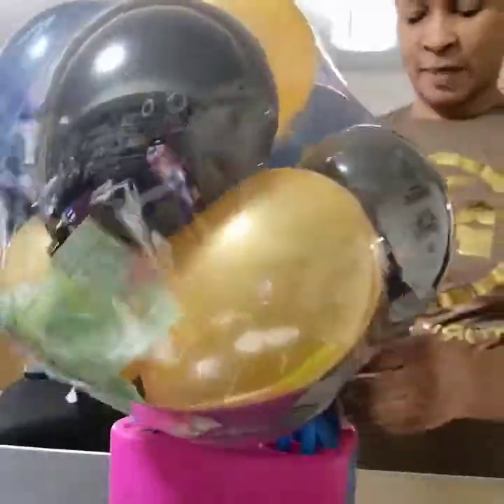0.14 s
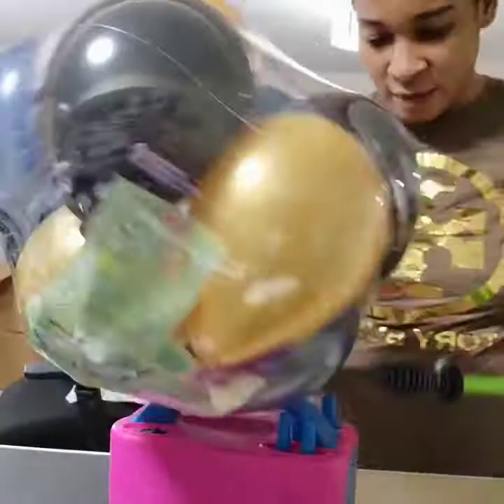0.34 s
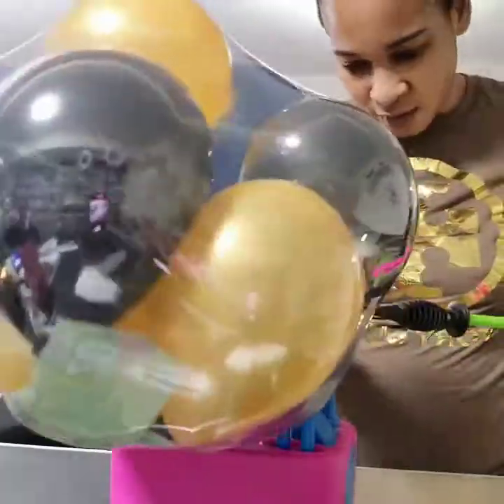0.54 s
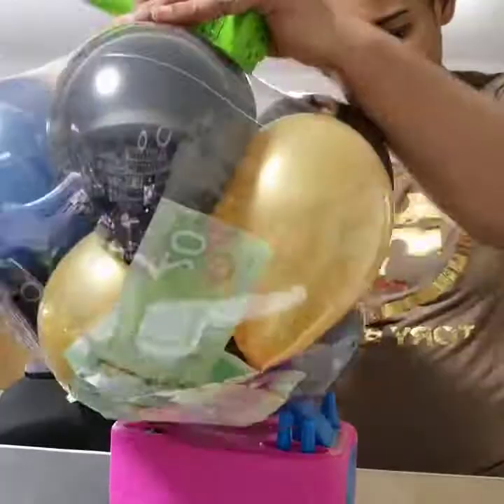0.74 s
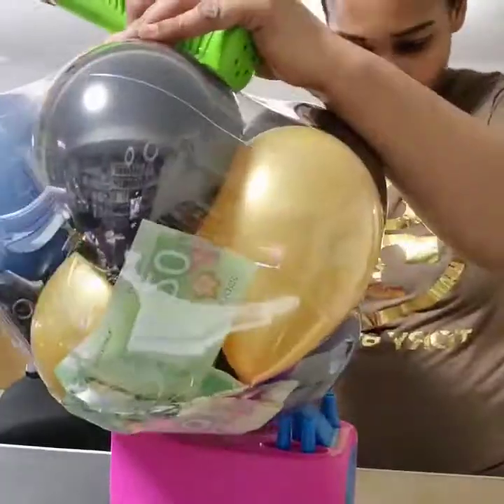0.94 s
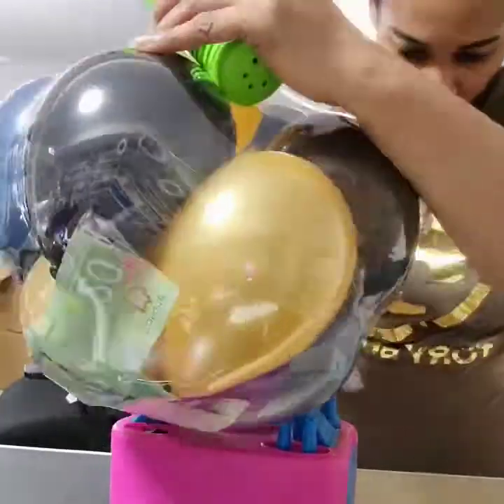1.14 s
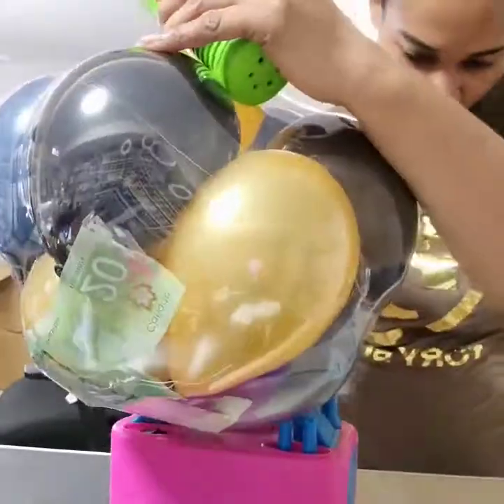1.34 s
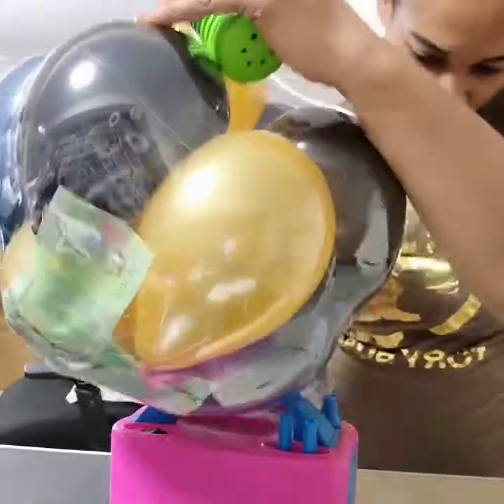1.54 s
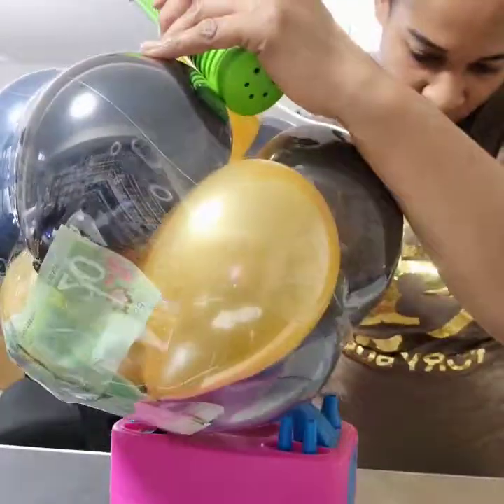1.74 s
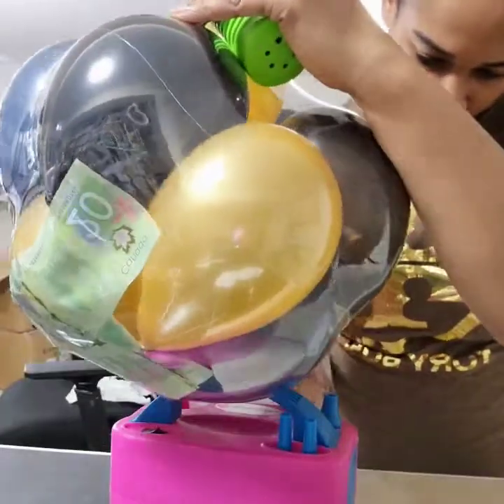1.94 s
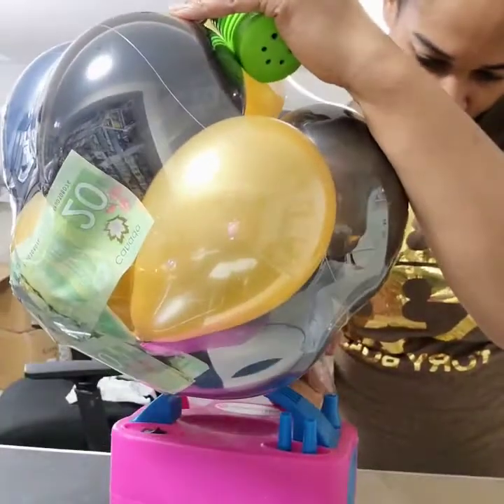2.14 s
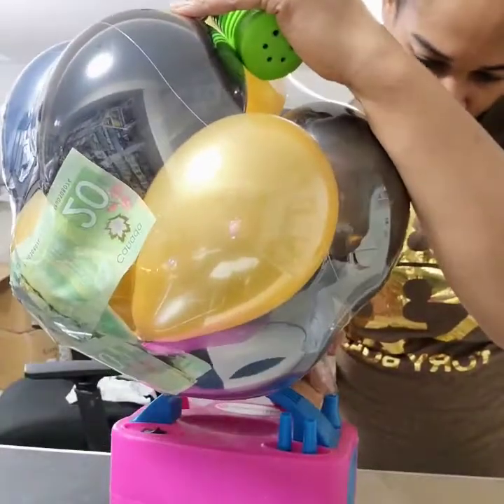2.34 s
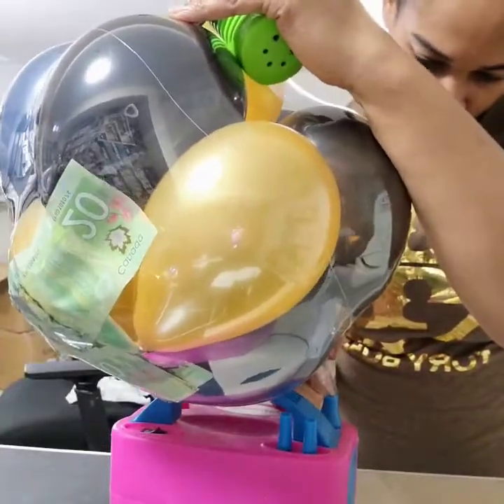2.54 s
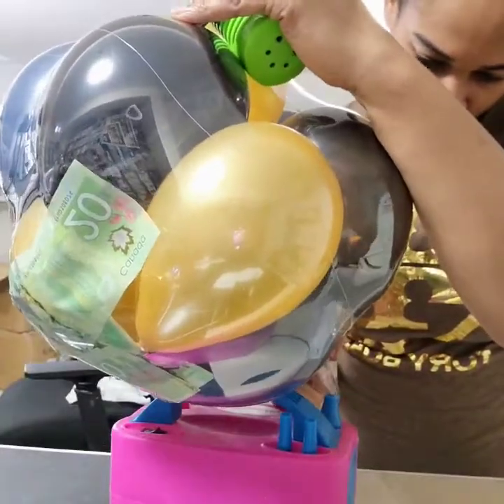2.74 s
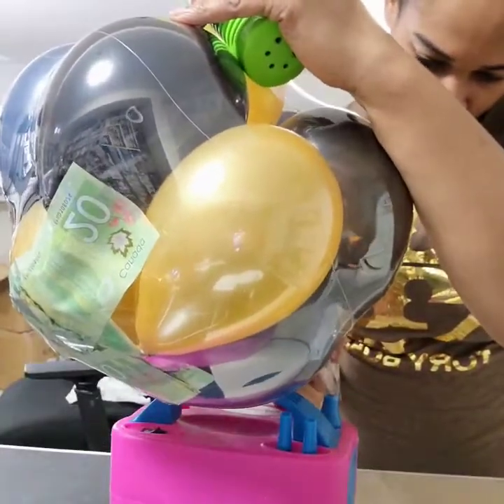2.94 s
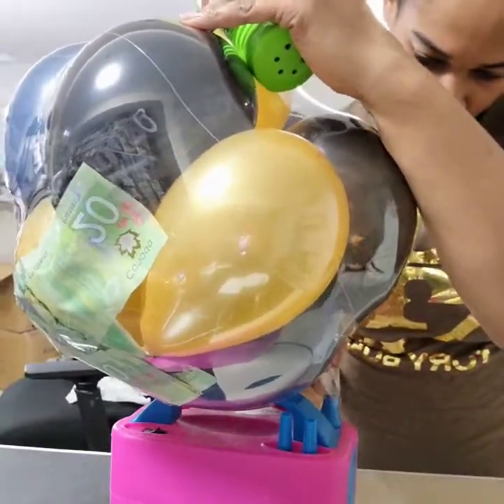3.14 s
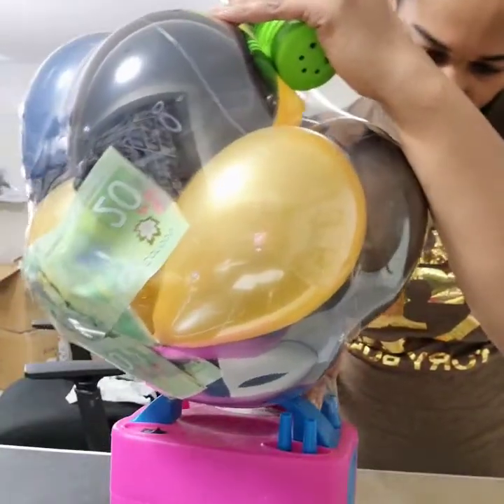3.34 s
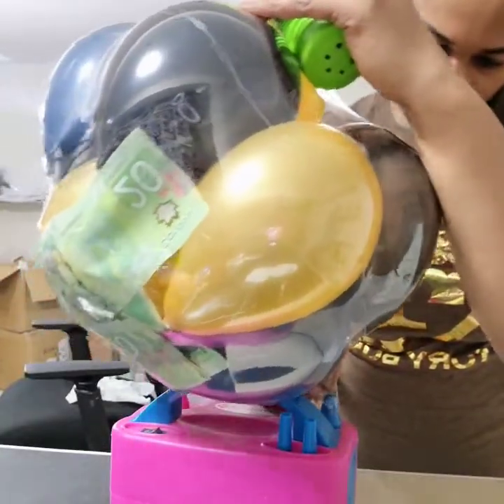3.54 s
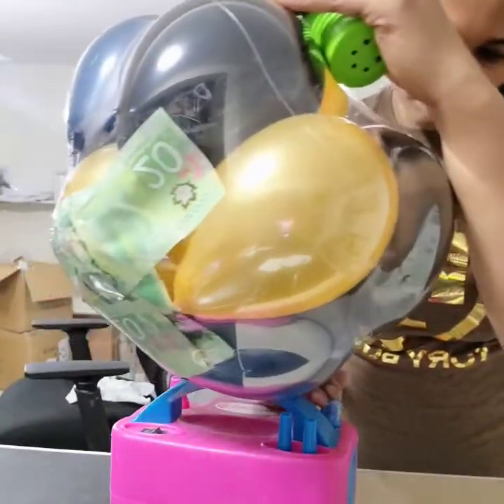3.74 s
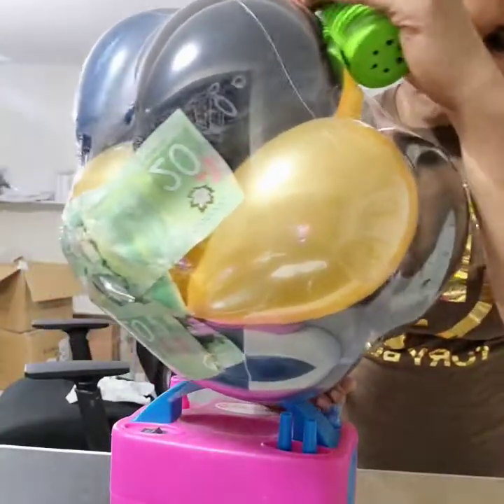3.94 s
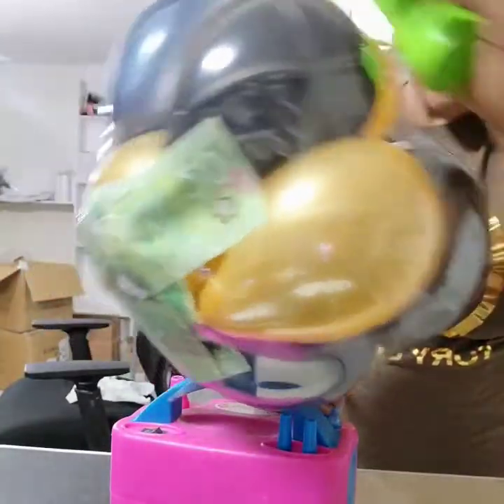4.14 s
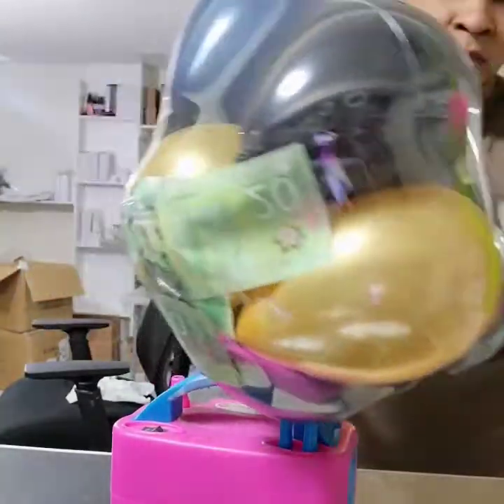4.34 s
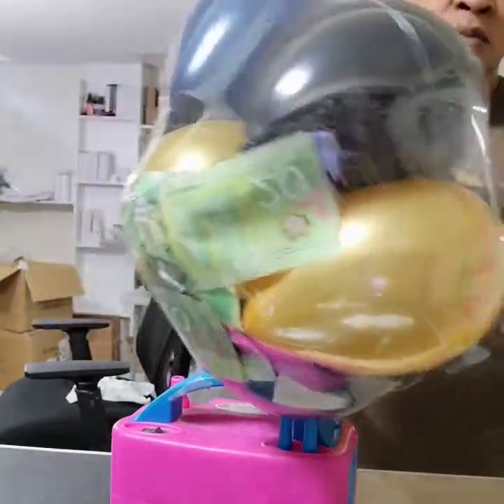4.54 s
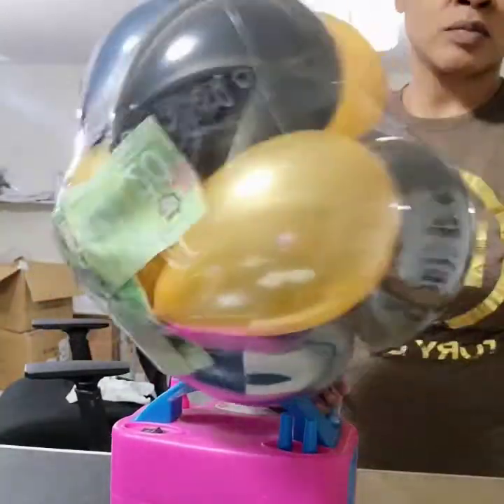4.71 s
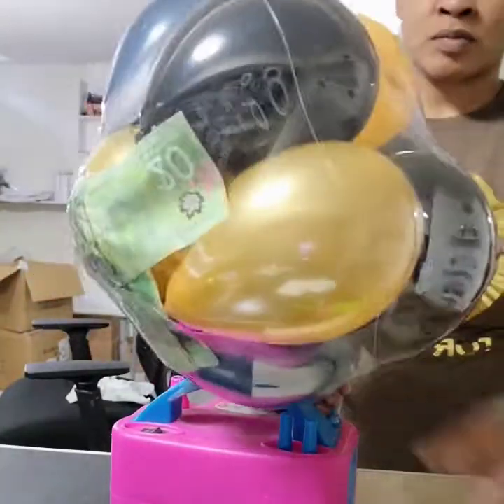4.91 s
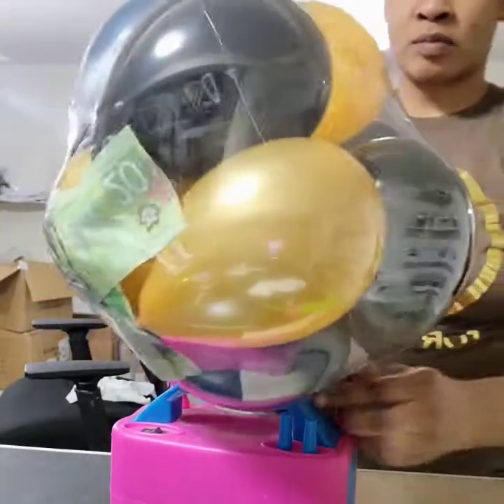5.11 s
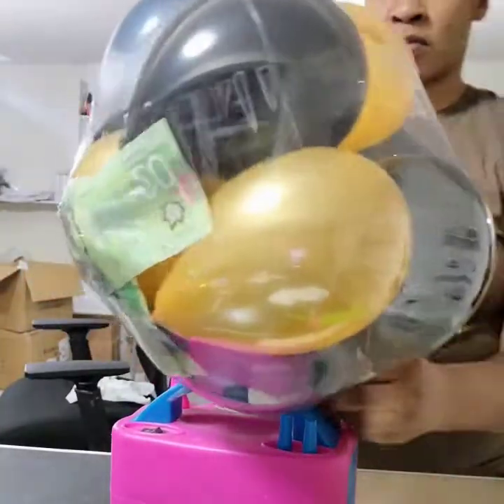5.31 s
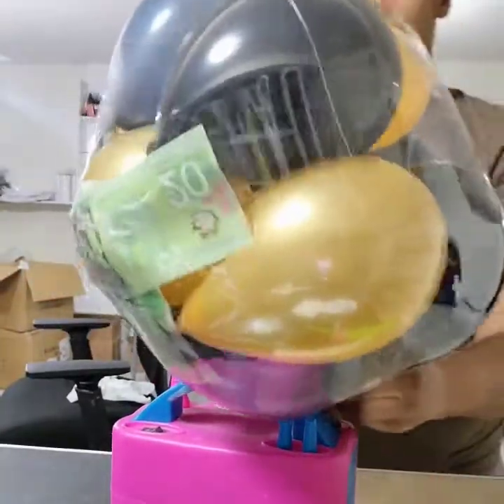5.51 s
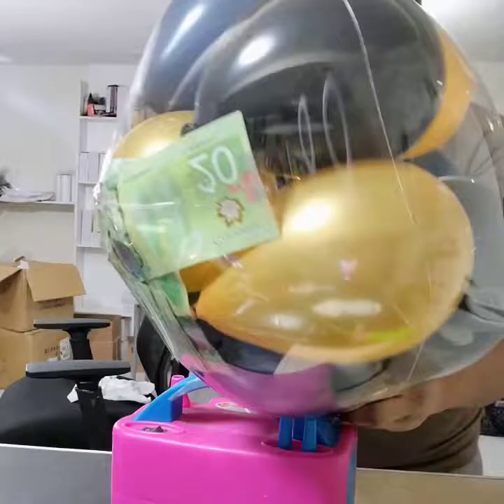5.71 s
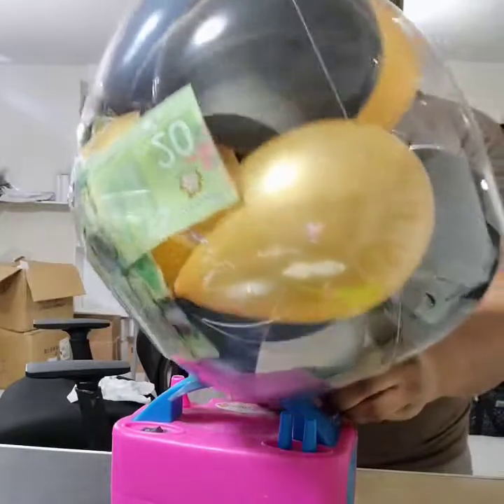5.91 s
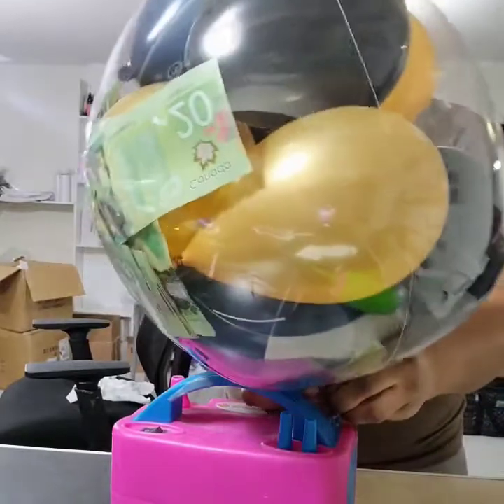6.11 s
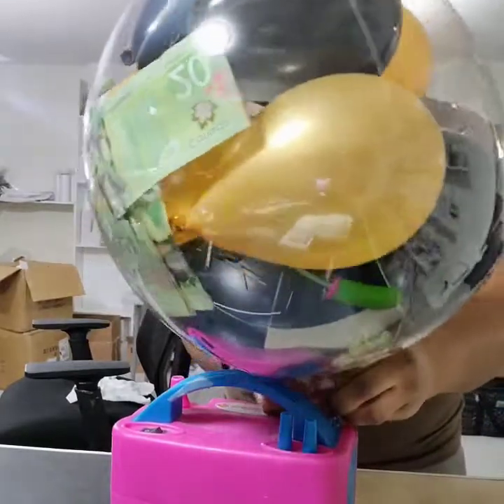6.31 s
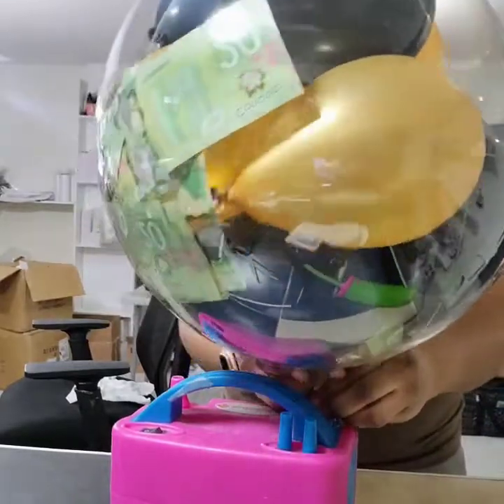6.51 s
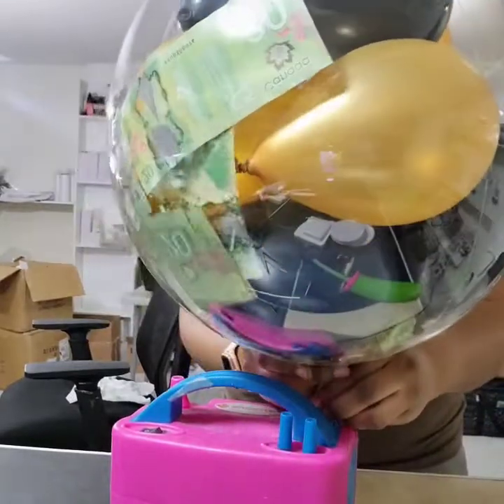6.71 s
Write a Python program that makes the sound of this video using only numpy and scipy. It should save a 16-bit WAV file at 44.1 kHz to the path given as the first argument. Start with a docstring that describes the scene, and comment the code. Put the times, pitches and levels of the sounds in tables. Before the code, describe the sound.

Fingers crackle and pop a taut plastic balloon, then a small electric pump whines, cuts out with a knock, restarts and roars air into it.

```python
"""A bearing squeaks and fingers shift a crackling plastic balloon on a pump nozzle, over a low room rumble.
The electric pump's fan runs out briefly; later the motor starts, is switched off and knocked while it coasts,
then starts again and whines up to speed while air rushes into the balloon, close up in a small room.
Shaft speed drives sine whines, shaped-noise air and motor whistle; load and switch set the mains buzz.
Balloon and case are noise bursts ringing decaying modes; rubbing is dense random ticks in shaped noise."""
import sys
import numpy as np
from scipy import signal
from scipy.fft import rfft, irfft
from scipy.io import wavfile
from scipy.ndimage import uniform_filter1d, map_coordinates

SR = 44100
rng = np.random.default_rng(int(sys.argv[2]) if len(sys.argv) > 2 else 0)


def waveform_to_disk(signal):
    """Save audio, clipped to [-1, 1], as 16-bit WAV at the path in sys.argv[1]."""
    frames = np.transpose(np.atleast_2d(signal))
    scaled = np.clip(frames, -1, 1) * 32767
    samples = np.round(scaled).astype(np.int16)
    wavfile.write(sys.argv[1], SR, samples)


N = 302526
T = np.arange(N) / SR
BINS = np.maximum(np.arange(N // 2 + 1) * SR / N, 1)  # spectrum frequencies, Hz


def undb(db):
    """Decibels to gain."""
    return 10 ** (np.asarray(db) / 20)


def contour(points):
    """Spectral gain interpolated over log frequency from (f/Hz, level/dB) points."""
    hz, db = np.transpose(points)
    return undb(np.interp(np.log(BINS), np.log(hz), db))


def band(x, hz, kind, order=2):
    """Butterworth filter."""
    return signal.sosfilt(signal.butter(order, hz, kind, fs=SR, output="sos"), x)


def pan(db):
    """Left and right gains for a level difference in dB."""
    return undb(np.array([[db], [-db]]) / 2)


def walk(rate):
    """Random wander with a spread near 1: levels held 1 / rate seconds, then smoothed twice."""
    hold = int(SR / rate)
    steps = np.repeat(rng.standard_normal(N // hold + 1), hold)
    return 1.05 * uniform_filter1d(uniform_filter1d(steps, hold), hold)[:N]


def gate(start, end, edge):
    """One between start and end, with ramps of edge seconds."""
    return np.clip(np.minimum(T - start, end - T) / edge, 0, 1)


def swell(s, length):
    """A smooth bump of height one around time s."""
    return np.exp(-(2 * (T - s) / length) ** 2)


def lift(hz, resonances):
    """Decibels added by (f/Hz, width/Hz, lift/dB) resonances."""
    return sum(db / (1 + (2 * (hz - centre) / width) ** 2) for centre, width, db in resonances)


# how unlike the two microphones hear the noise: (f/Hz, side minus mid level/dB)
STEREO_WIDTH = [(60, -30), (500, -7.5), (1200, -4), (2200, -5.5), (4500, -2.5), (12000, -1)]


def noise(gain, drive=1):
    """Coloured stereo noise, alike in the bass and unrelated in the treble."""
    mid, side = rfft(rng.standard_normal((2, N)) * drive) * gain
    side = side * contour(STEREO_WIDTH)
    polarity = np.array([[1], [-1]])
    return irfft(mid + polarity * side, N) / np.std(irfft(mid, N))


def ring(modes, t):
    """Decaying (f/Hz, level/dB, t60/s) modes, slightly detuned afresh at every blow."""
    out = 0
    for hz, db, t60 in modes:
        detuned_hz = hz * (1 + 0.0093 * rng.standard_normal())
        out = out + undb(db) * np.sin(2 * np.pi * detuned_hz * t) * undb(-60 * t / t60)
    return out


def add(out, s, sound):
    """Mix a short sound in at time s."""
    i = int(s * SR)
    out[:, i:i + sound.shape[-1]] += sound[..., :N - i]


def cavity(x, t60=.025, share=.45):
    """Dense reflections in a small hollow comb the treble, differently towards each microphone."""
    t = np.arange(SR // 20) / SR
    echoes = band(rng.standard_normal((2, len(t))), 830, "highpass") * undb(-60 * t / t60) * (t > .001)
    echoes = share * echoes / np.sqrt(np.sum(echoes ** 2, axis=1, keepdims=True))
    return x + signal.fftconvolve(x, echoes, axes=1)[:, :N]


def room(x, t60=0.13, wet_db=-14.5):
    """A short, dull tail from the walls, after a 6 ms gap."""
    t = np.arange(SR // 3) / SR
    tail = band(rng.standard_normal((2, len(t))), [300, 5000], "bandpass", order=1)
    tail = tail * undb(-60 * t / t60) * (t > .006)
    tail = tail / np.sqrt(np.sum(tail ** 2, axis=1, keepdims=True))
    return x + undb(wet_db) * signal.fftconvolve(x, tail, axes=1)[:, :N]


# colour of the room's rumble: (f/Hz, relative level/dB per Hz)
RUMBLE_COLOUR = [(20, -16), (55, -0.5), (85, -12.5), (118, -1.5), (175, -10), (260, -19.5), (500, -26.5),
                 (1200, -40), (4000, -48), (15000, -63)]
RUMBLE_DB = -52


def rumble():
    """Low room tone: bass-heavy noise, gently wandering in level."""
    return noise(contour(RUMBLE_COLOUR)) * undb(RUMBLE_DB + walk(5.0))


# bearing squeaks: (start t/s, end t/s, start f/Hz, end f/Hz, relative level/dB)
BEARING_SQUEAKS = [(-.02, .075, 2030, 1990, -56), (.415, .595, 2010, 1990, -58),
                   (.38, .52, 7250, 6750, -64), (.495, .55, 7170, 6950, -59), (.495, .585, 5400, 5080, -64)]


def bearing():
    """Thin, broken, falling bearing squeaks: sines with jittering pitch and level."""
    out = 0
    for start, end, first_hz, last_hz, db in BEARING_SQUEAKS:
        hz = np.interp(T, [start, end], [first_hz, last_hz])
        hz = hz * (1 + .012 * walk(45) + .012 * walk(500))
        strength = undb(db + 1 + 4 * walk(130)) * gate(start, end, .015)
        out = out + strength * np.sin(2 * np.pi * np.cumsum(hz) / SR)
    return out


# fingers rubbing the skin: (t/s, length/s, relative level/dB, patch f/Hz, patch squeak relative level/dB)
FINGER_SLIDES = [(0.01, 0.05, -46.5, 844, -6), (0.143, 0.049, -41, 890, -7), (0.81, 0.032, -51, 1500, -13),
                 (1.08, 0.081, -54.5, 1460, -10), (1.199, 0.021, -41.5, 910, -9),
                 (1.547, 0.039, -58.5, 1420, -4), (1.82, 0.25, -61, 1580, -13),
                 (2.28, 0.22, -60, 840, -7.5), (2.45, 0.72, -79, 1380, -15), (3.14, 0.23, -62, 510, -2.5),
                 (3.34, 0.22, -50.5, 1650, -13), (3.53, 0.34, -50.5, 2900, -21),
                 (4.17, 0.3, -53, 4230, -13)]
# colour of the rubbed skin: (f/Hz, relative level/dB per Hz)
SKIN_COLOUR = [(150, 6), (350, 9.5), (650, 6.5), (930, 0.5), (1220, -4), (1500, 1), (2200, -4), (2750, -9),
               (4000, -4), (5500, -10.5), (9000, -17), (15000, -46)]
# creases set off by rubbing: their mean rate and the spread of their sizes
CREASES_PER_S, CREASE_SPREAD_DB = 220, 8
# rustle around every snap: lead and length, level relative to the snap's, patch pitch
RUSTLE_LEAD_S, RUSTLE_S, RUSTLE_DB, RUSTLE_HZ = 0.028, 0.072, -27.5, 980


def handling():
    """Fingers stick and slip, setting off dense tiny creases that ring the patch of skin under them."""
    grip = undb(2.5 * walk(45))
    sizes = undb(CREASE_SPREAD_DB * np.minimum(rng.exponential(size=N), 2.5))
    creases = (rng.random(N) < CREASES_PER_S / SR) * sizes
    drive = grip * (uniform_filter1d(creases, size=24) + .04)
    crinkle = cavity(noise(contour(SKIN_COLOUR), drive), t60=.045, share=.8)
    # the whole balloon booms softly with every movement
    boom = noise(contour([(30, -1.5), (110, 1.0), (200, -7.0), (400, -5.0), (1000, -43.5)]))
    rustles = [(max(s - RUSTLE_LEAD_S, 0), RUSTLE_S, db + RUSTLE_DB, RUSTLE_HZ, -13)
               for s, db, *_ in SKIN_SNAPS]
    out = np.zeros((2, N))
    for s, length, db, hz, squeak_db in [*FINGER_SLIDES, *rustles]:
        span = slice(int(s * SR), int((s + length) * SR))
        patch = band(crinkle[:, span], [hz * .92, hz * 1.08], "bandpass", order=1)
        squeak = undb(squeak_db) * patch / np.std(patch)
        rub = undb(-3.5) * crinkle[:, span] + squeak + boom[:, span]
        add(out, s, undb(db) * rub * signal.windows.tukey(rub.shape[1], .5))
    return out


# snaps of the skin, part levels before their trims: (t/s, level/dB, thump level/dB, treble level/dB,
# pop f/Hz, pop level/dB, ring f/Hz, ring level/dB)
SKIN_SNAPS = [(0.033, -34.5, -10, -1, 834, -2, 2070, -9), (0.859, -26, -21, 3.5, 360, 0, 1400, -8.5),
              (0.985, -42, -13, 6, 700, -19, 1530, -8), (1.219, -36, -21, 12.5, 1090, -12, 2300, -14),
              (1.236, -23, -19, 3, 494, -3, 1580, -6), (1.419, -40, -4.5, -19, 534, -2.5, 1520, -4.5),
              (1.601, -31, -15, 2, 1520, -27, 2363, -8), (2.06, -23, -8, 8.5, 940, -3.5, 2180, -10),
              (2.159, -40, 0, -28, 740, 1, 1600, -6.5), (2.976, -38, -7, 1.5, 770, -9, 2040, -13),
              (3.083, -35.5, -13, -23, 894, -2, 1700, -9.5), (3.412, -33.5, -4, -1, 494, -16, 1750, -7),
              (3.771, -29, 2.5, -17, 684, -11, 1360, -4), (4.012, -24.5, -7, 1, 704, -6.5, 2160, -12),
              (4.08, -26.5, 0.5, -3.5, 900, -2.5, 2100, -14)]
# the taut balloon answering a snap or bump: (f/Hz, relative level/dB, t60/s)
BALLOON_MODES = [(122, -2, 0.052), (169, 0.5, 0.06), (301, 4.5, 0.032), (511, -4, 0.026), (774, -11, 0.071),
                 (1533, -25, 0.15)]
# the buckling patch as a small membrane: (multiple of its ring f, relative level/dB, t60/s)
PATCH_MODES = [(1, -1, .024), (1.5, -3, 0.024), (2.2, -4, 0.019), (2.95, -4.5, 0.015)]
POP_T60_S = 0.028


def snaps():
    """The skin buckles: a faint noise ramp, a dry crack, a ringing patch, a hollow pop and a thump of inner air."""
    out, t, ramp_s = np.zeros((2, N)), np.arange(SR // 5) / SR, .012
    age = np.maximum(t - ramp_s, 0)
    ramp = undb(-23.5) * t / ramp_s
    buckling = undb(0.5 - 60 * age / 0.015) + undb(-18.5 - 60 * age / 0.075)
    for s, db, thump_db, treble_db, pop_hz, pop_db, ring_hz, ring_db in SKIN_SNAPS:
        burst = rng.standard_normal(len(t)) + 1.54 * rng.standard_normal((2, len(t)))
        burst = burst * np.where(t < ramp_s, ramp, buckling)
        crack = band(burst, [500, 6000], "bandpass")
        crack = undb(-2) * band(crack, 2800, "lowpass", order=1)
        treble = undb(treble_db - 7) * band(burst, [5000, 9400], "bandpass")
        patch = ring([(ring_hz * k, ring_db + mode_db, t60) for k, mode_db, t60 in PATCH_MODES], age)
        pop = ring([(pop_hz, pop_db, POP_T60_S)], age)
        thump = undb(thump_db - 1.5) * ring(BALLOON_MODES, age)
        add(out, s - ramp_s, undb(db) * (crack + patch + pop + treble + thump) * pan(-1.3))
    return out


# the switch is held down: (on t/s, off t/s)
SWITCH_HELD = [(4.37, 4.707), (5.619, 7)]
# full and slowest turns per second, spin-up time constant, and turns in which coasting slows by a factor e
FULL_HZ, SLOWEST_HZ, SPIN_UP_S, COAST_TURNS = 633, 33, .197, 752
# the first run-out: start and end, its starting speed, drag time constant and dry friction
RUN_OUT_S, STOP_S, RUN_OUT_HZ, BRAKE_S, FRICTION_HZ_PER_S = .22, .64, 342, .4, 412


def shaft():
    """Turns per second: friction brakes the run-out, power closes in on full speed, air drag slows the coast."""
    friction_hz = FRICTION_HZ_PER_S * BRAKE_S
    decay = np.exp(-np.maximum(T - RUN_OUT_S, 0) / BRAKE_S)
    hz = np.maximum((RUN_OUT_HZ + friction_hz) * decay - friction_hz, SLOWEST_HZ)
    for on, off in SWITCH_HELD:
        shortfall = np.exp(-(np.clip(T, on, off) - on) / SPIN_UP_S)
        driven = FULL_HZ + (np.interp(on, T, hz) - FULL_HZ) * shortfall
        coasting = driven / (1 + driven * np.maximum(T - off, 0) / COAST_TURNS)
        hz = np.where(T < on, hz, coasting)
    return hz


# shaft harmonics from imbalance and the seven vanes:
# (multiple of shaft f, level/dB relative to the air setting, shaft f/Hz above which it fades)
RATTLE_ORDERS = [(3, -17, 300), (4, -18, 180), (7, -23.5, 470)]
# the housing passes the whine at some speeds and swallows it at others: (shaft f/Hz, width/Hz, lift/dB)
WHINE_PASS = [(105, 42, 6), (224, 16, 8.5), (329, 12.5, -11), (344.7, 56, 11.5), (406, 75, 16),
              (487, 102, -6.5), (556.5, 73, 20), (639.6, 114, 22.5)]
# panels that sing when a harmonic sweeps through them: (f/Hz, width/Hz, lift/dB)
SINGING_PANELS = [(700, 260, 19), (1320, 170, 16), (3130, 360, 14), (4600, 1200, 6)]
# whine base level, the speed below which it dies away, and its flicker near standstill
WHINE_DB, WHINE_LOW_HZ, WOBBLE_DB = -39.5, 72, 6


def rotor(hz, phase, air_db):
    """The unbalanced fan sings once a turn; its rattling overtones grow with the air it moves."""
    flicker_db = 0.69 * walk(33) + WOBBLE_DB * (1 - hz / FULL_HZ) ** 2 * walk(80)
    whine = undb(WHINE_DB + lift(hz, WHINE_PASS) + flicker_db) * np.sin(phase)
    whine = whine / (1 + (WHINE_LOW_HZ / hz) ** 4)
    overtones = 0
    for k, db, fade_hz in RATTLE_ORDERS:
        strength = undb(air_db + db + lift(k * hz, SINGING_PANELS) + 2.5 * walk(90))
        strength = strength / (1 + (hz / fade_hz) ** 8)
        overtones = overtones + strength * np.sin(k * phase + .5 * walk(250))
    return np.sqrt(2) * (whine + overtones) * pan(-2.7)


DRIFT, FLOW_BEND = .008, .025  # wander and rise with the flow, as shares of pitch


def drift(x, hz):
    """Slide all the resonances of a steady noise together, wandering and rising a little with the flow."""
    place = np.cumsum(1 + DRIFT * walk(7) + FLOW_BEND * (hz / FULL_HZ - .85))
    return np.array([map_coordinates(side, [place], order=3, mode="mirror") for side in x])


# air inside the housing: (f/Hz, relative level/dB per Hz)
FAN_COLOUR = [(30, -18), (90, 5), (200, 5), (330, 11), (600, 7.5), (950, 3), (1500, -1), (2600, -1.5),
              (5000, -3.5), (9000, -11.5), (10300, -14), (10950, -21), (11800, -14.5), (15500, -18.5)]
# the jet into the balloon: (f/Hz, relative level/dB per Hz)
JET_COLOUR = [(30, -14), (60, 0.5), (140, 6), (450, 5.5), (780, 7.5), (1130, -2), (1600, 8), (2200, 5.5),
              (2750, -0.5), (3500, 1.5), (7500, -7), (10950, -11), (12000, -10), (15500, -10)]
# housing resonances: (f/Hz, width/Hz, lift/dB)
HOUSING_MODES = [(1450, 40, 3.5), (1660, 190, 5.5), (1915, 19, 8), (2170, 246, 4.5), (6350, 130, 12),
                 (7380, 170, 8)]
HOUSING_ECHO, JET_ECHO = .7, .45  # reflections relative to the direct noise


def air(hz, phase, air_db, hiss_db, jet_share):
    """Turbulence rings the housing; as the nozzle opens, the jet into the balloon takes over."""
    housing_db = lift(BINS, HOUSING_MODES)
    churn = (1 + 0.094 * np.sin(phase)) * undb(0.97 * walk(90))
    fan = noise(contour(FAN_COLOUR) * undb(housing_db))
    jet = noise(contour(JET_COLOUR) * undb(0.43 * housing_db))
    share = np.clip(jet_share, 0, 1)
    out = 0
    for flow, weight, echo in ((fan, np.sqrt(1 - share), HOUSING_ECHO), (jet, np.sqrt(share), JET_ECHO)):
        mono = flow.mean(0)
        body_rms = np.std(band(mono, [1200, 5000], "bandpass", order=4))
        hiss_rms = np.std(band(mono, [8000, 15000], "bandpass", order=4))
        flow = drift(cavity(flow, share=echo), hz)
        hiss = irfft(rfft(flow) / (1 + (7000 / BINS) ** 4), N)
        body = (flow - hiss) / body_rms * pan(0.19)
        out = out + weight * (body + hiss / hiss_rms * undb(hiss_db) * pan(-1.1))
    return out * churn * undb(air_db + 0.85 * walk(10))


# short rises and dips in one band of the rushing air: (t/s, length/s, low f/Hz, high f/Hz, lift/dB)
BAND_SWELLS = [(0.28, 0.13, 1610, 5200, 4), (4.7, 0.064, 511, 9000, -3.5), (4.97, 0.054, 2300, 8000, -4),
               (5.02, 0.058, 1090, 2580, -11), (5.173, 0.32, 1240, 2180, 5.5), (5.206, 0.24, 3000, 4250, 4),
               (5.515, 0.22, 1520, 5360, 1.5), (6, 0.069, 1810, 3800, 3), (6.012, 0.14, 3000, 14200, 4.5),
               (6.056, 0.11, 4300, 5670, 6), (6.272, 0.038, 1920, 8000, 5), (6.34, 0.032, 2700, 6000, 4.5),
               (6.43, 0.11, 2400, 4800, 4), (6.646, 0.32, 1420, 2580, 1.5)]


def band_swells(x):
    """Short rises and dips, each in one band of the rushing air."""
    spectrum = rfft(x)
    for s, length, low_hz, high_hz, db in BAND_SWELLS:
        part = irfft(spectrum / (1 + (low_hz / BINS) ** 10 + (BINS / high_hz) ** 10), N)
        x = x + part * (undb(db * swell(s, length)) - 1)
    return x


# centres of the air bands that wander independently: (f/Hz)
WANDERING_BANDS = [850, 1650, 2200, 3400, 4700]


def gurgle(x, depth_db=2.2):
    """Each band of the air noise wanders randomly in level."""
    wander = 0
    for hz in WANDERING_BANDS:
        part = band(x, [hz * .86, hz * 1.16], "bandpass", order=1)
        wander = wander + part * (undb(depth_db * walk(16) - .5) - 1)
    return x + wander


# the case shakes with the buzz around a low speed: (shaft f/Hz, width/Hz, lift/dB)
CASE_SHAKE = [(184, 280, 10)]
BUZZ_DB, STALL_DB = -38, 10  # buzz base level, and its rise towards standstill


def current(hz):
    """Level of the mains buzz in dB: a slow motor draws more current, a coasting one none."""
    powered = sum(gate(on, off, .018) for on, off in SWITCH_HELD)
    switch_db = 20 * np.log10(powered + 1e-4)
    return BUZZ_DB + STALL_DB * (1 - hz / FULL_HZ) + lift(hz, CASE_SHAKE) + switch_db


# partials of the slot whistle: (multiple of shaft f, relative level/dB)
WHISTLE_ORDERS = [(12, 0), (10, -17), (14, -17), (24, -21)]
SLOT_DB, SLOT_FLICKER_DB = -12, 3  # whistle level relative to the capped buzz, and its flicker


def windings(hz, phase, buzz_db):
    """Current pulls the iron at twice the mains rate, and twelve armature slots whistle past the poles."""
    mains = 2 * np.pi * 120 * T
    buzz = np.sin(mains)
    for k in range(2, 9):
        wander = rng.uniform(0, 2 * np.pi) + .5 * walk(60)
        buzz = buzz + undb(-15.5) * k ** -.4 * np.sin(k * mains + wander)
    slots = sum(undb(db) * np.sin(k * phase + 1.1 * walk(700)) for k, db in WHISTLE_ORDERS)
    slots = slots * (1 + .8 * np.sin(mains))
    # the whistle saturates with current; it needs some speed and fades again near the top
    slots_db = np.minimum(buzz_db, -30) + SLOT_DB + lift(12 * hz, SINGING_PANELS)
    slots_db = slots_db + SLOT_FLICKER_DB * walk(150)
    slots = undb(slots_db) * slots * np.minimum(hz / 150, 1) / (1 + (hz / 450) ** 8)
    # the strain of speeding up brings out the third shaft harmonic
    strain = undb(np.minimum(buzz_db, -26) - 6.5) * np.sin(3 * phase + .5 * walk(250))
    strain = strain / (1 + (hz / 400) ** 8 + (270 / hz) ** 8)
    return np.sqrt(2) * (undb(buzz_db) * buzz * pan(-3.5) + slots + strain)


# the balloon's neck flapping as it unfolds: (f/Hz, relative level/dB per Hz)
FLAP_COLOUR = [(100, -31), (260, -15), (340, 1), (420, -5), (650, -39), (1350, -27), (1730, -2),
               (2200, -61), (4000, -54)]
# air and hiss settings at full speed, before the rush trim, and how steeply each grows with speed
FAN_DB, FAN_DB_PER_DECADE = -27, 32.5
HISS_DB, HISS_DB_PER_DECADE = -27, 56.5
RUSH_TRIM_DB = -1.96
# the neck opens and the jet adds its roar, which eases as the balloon fills
OPEN_S, OPENING_S, JET_DB, EASE_DB_PER_S = 5.623, 0.29, 9.5, 2.5
# the open neck flutters; once it flaps hard and chokes the hiss
FLUTTER_DB = -32.5
FLAP_S, FLAP_LENGTH_S, FLAP_DB, CHOKE_DB = 6.125, 0.089, -18.5, -3


def pump():
    """Shaft speed sets the whine, the air and the buzz; the opening neck adds the jet and its flapping."""
    hz = shaft()
    phase = 2 * np.pi * np.cumsum(hz * (1 + 0.0019 * walk(40))) / SR
    decades = np.log10(hz / FULL_HZ)
    opening = np.clip((T - OPEN_S) / OPENING_S, 0, 1)
    flapping = swell(FLAP_S, FLAP_LENGTH_S)
    jet_db = opening * (JET_DB - EASE_DB_PER_S * (T - OPEN_S))
    air_db = FAN_DB + FAN_DB_PER_DECADE * decades + jet_db
    hiss_db = HISS_DB + HISS_DB_PER_DECADE * decades + CHOKE_DB * flapping
    flap = (undb(FLUTTER_DB) * opening + undb(FLAP_DB) * flapping) * noise(contour(FLAP_COLOUR))
    rush = air(hz, phase, air_db, hiss_db - air_db, opening)
    rush = undb(RUSH_TRIM_DB) * gurgle(band_swells(rush))
    # heard during the run-out, then from the first switch-on
    turning = gate(RUN_OUT_S, STOP_S, 0.013) + np.clip((T - SWITCH_HELD[0][0]) / 0.003, 0, 1)
    return (rotor(hz, phase, air_db) + rush + windings(hz, phase, current(hz)) + flap) * turning


# soft bumps of the balloon: (t/s, relative level/dB)
BALLOON_BUMPS = [(0.471, -36), (0.506, -31), (0.602, -35.5), (0.824, -40)]


def bumps():
    """Soft bumps boom the air in the balloon, first as the fan comes to rest, then under the hand."""
    out, t = np.zeros((2, N)), np.arange(SR // 5) / SR
    for s, db in BALLOON_BUMPS:
        boom = band(ring(BALLOON_MODES, t), 260, "lowpass", order=1)
        add(out, s, undb(db) * boom * np.minimum(t / 0.0027, 1))
    return out


# the film around a crease: (f/Hz, relative level/dB, t60/s)
FILM_MODES = [(828, -2, 0.028), (1457, -6, 0.031), (2070, -12.5, 0.036), (2390, -11.5, 0.033),
              (3620, -1.5, 0.022), (4830, -0.5, 0.014), (7200, -6, 0.0091)]


def crease():
    """One tiny buckle: a tick that rings a patch of film, each of its own size."""
    t = np.arange(SR // 20) / SR
    size = undb(1.1 * rng.standard_normal())
    tick = band(rng.standard_normal((2, len(t))), [900, 9000], "bandpass", order=1) * undb(-60 * t / 0.037)
    modes = [(hz * size, db + 3 * rng.standard_normal(), t60) for hz, db, t60 in FILM_MODES]
    return undb(-5.5) * tick + undb(-9) * ring(modes, t)


# small creases popping out: (t/s, relative level/dB)
SINGLE_CREASES = [(0.866, -34), (1.134, -47), (1.207, -33), (0.961, -50), (1.297, -56), (1.316, -56),
                  (1.725, -51), (2.079, -53), (2.459, -56), (2.843, -43.5), (2.996, -37.5), (3.013, -35.5),
                  (3.259, -49), (3.375, -41.5), (3.548, -45), (3.64, -41.5), (3.717, -40.5), (3.746, -39.5),
                  (3.911, -34.5), (4.038, -43), (4.069, -35)]
# a finger judders across the taut skin: start, length, slip rate, relative level
JUDDER_S, JUDDER_LENGTH_S, SLIPS_PER_S, JUDDER_DB = 3.436, 0.097, 130, -35


def crackle():
    """Single creases pop out, and a juddering finger plucks one patch of skin, pressing and easing."""
    out = np.zeros((2, N))
    for s, db in SINGLE_CREASES:
        add(out, s, undb(db) * crease() * pan(2 * rng.standard_normal()))
    slips = np.arange(JUDDER_S, JUDDER_S + JUDDER_LENGTH_S, 1 / SLIPS_PER_S)
    pressure = np.sin(np.pi * np.linspace(.2, .9, len(slips)))
    patch = crease()
    for s, press in zip(slips, pressure):
        pluck = band(patch + .5 * crease(), [700, 3300], "bandpass")
        add(out, s + .0008 * rng.standard_normal(), undb(JUDDER_DB) * press * pluck)
    return out


# knocks on the pump's plastic case: (t/s, relative level/dB, contact brightness f/Hz)
CASE_KNOCKS = [(4.373, -16, 810), (4.8918, -4, 1100), (4.895, -4.5, 5100), (4.942, -23, 1500),
               (4.964, -13, 1690), (4.977, -8, 700)]
# the ringing case: (f/Hz, relative level/dB, t60/s)
CASE_MODES = [(269, -12.5, 0.09), (620, -6, 0.0056), (980, -18, 0.044), (1570, -4, 0.068),
              (2100, -12.5, 0.033), (3560, -9.5, 0.067), (5050, -7, 0.014)]


def knocks():
    """Blows on the pump's plastic case; a soft contact leaves only the low modes."""
    out, t = np.zeros((2, N)), np.arange(SR // 5) / SR
    for s, db, bright_hz in CASE_KNOCKS:
        contact = rng.standard_normal(len(t)) + .5 * rng.standard_normal((2, len(t)))
        blow = .5 * ring(CASE_MODES, t) + 0.5 * contact * undb(-60 * t / 0.055)
        add(out, s, undb(db) * band(blow * np.minimum(t / 0.00019, 1), bright_hz, "lowpass"))
    return out


def scene():
    """Pump and hands over the low rumble of the room; balloon and knocks get the wall tail."""
    low = rumble()
    return pump() + bearing() + room(snaps() + handling() + knocks() + bumps() + crackle()) + low


def record(dry):
    """The microphone sheds the deepest bass, clips at full scale and cuts the top."""
    heard = np.clip(band(dry, 41, "highpass"), -1, 1)
    top_cut = signal.ellip(8, .2, 70, 15600, fs=SR, output="sos")  # ripple dB, rejection dB, edge Hz
    return signal.sosfilt(top_cut, heard)


dry = scene()
out = record(dry)
waveform_to_disk(out)
```